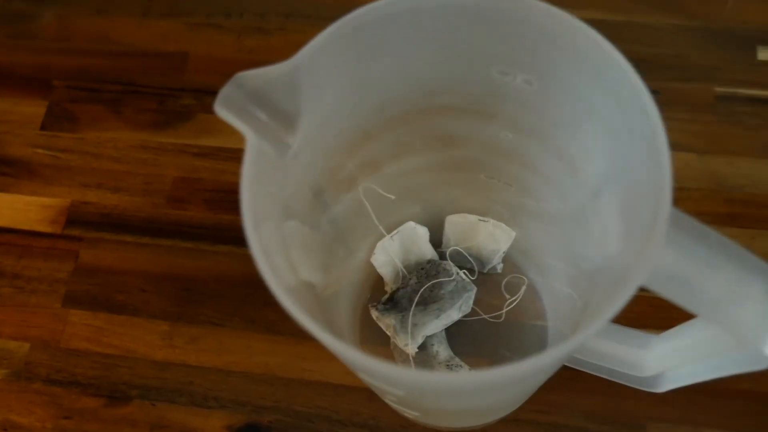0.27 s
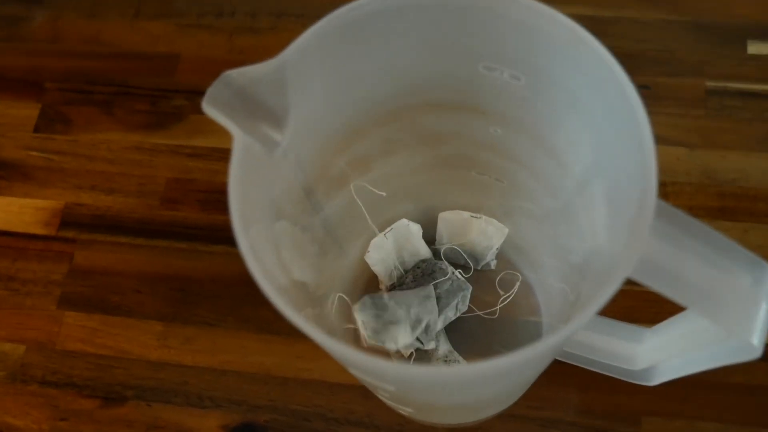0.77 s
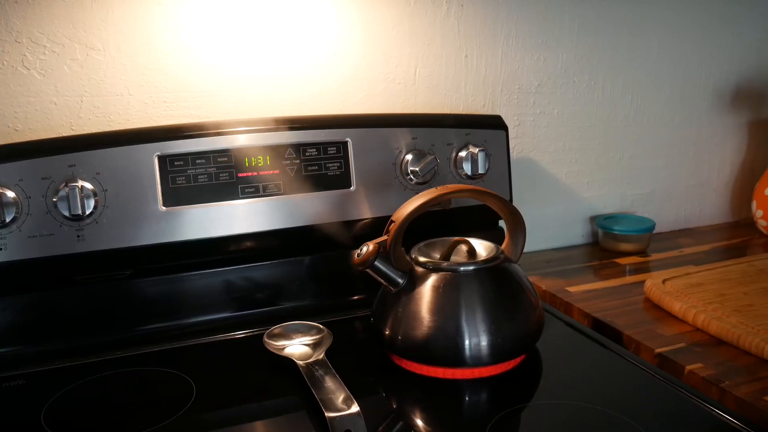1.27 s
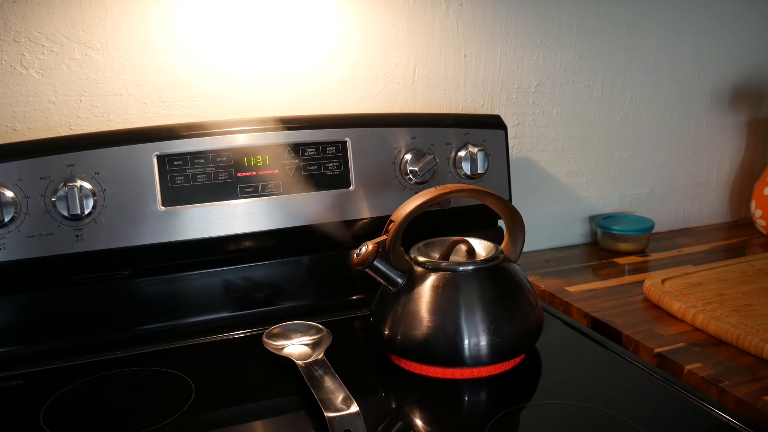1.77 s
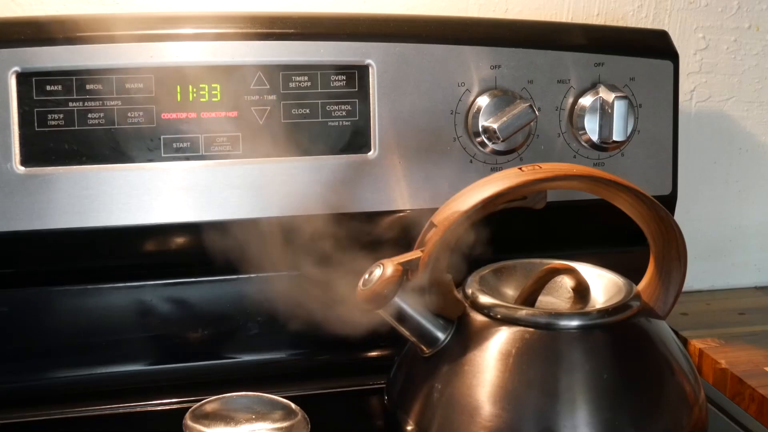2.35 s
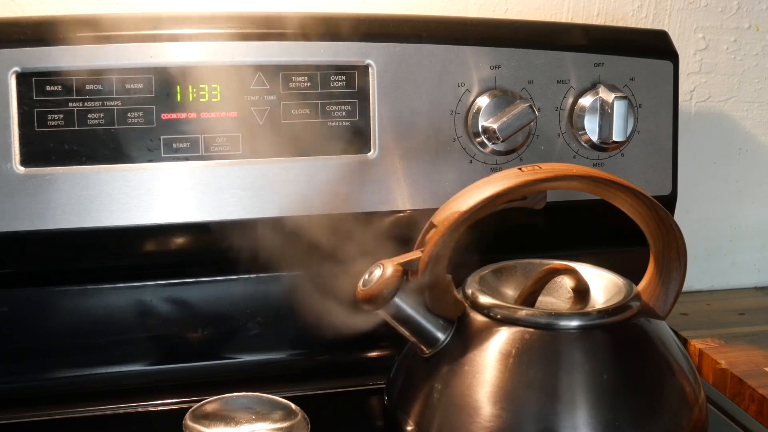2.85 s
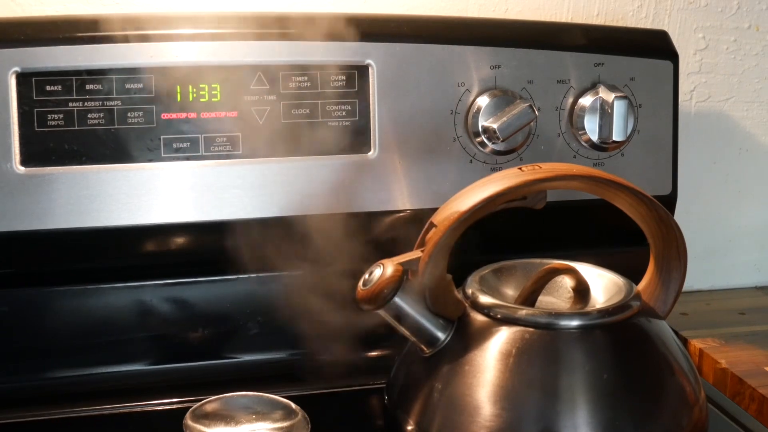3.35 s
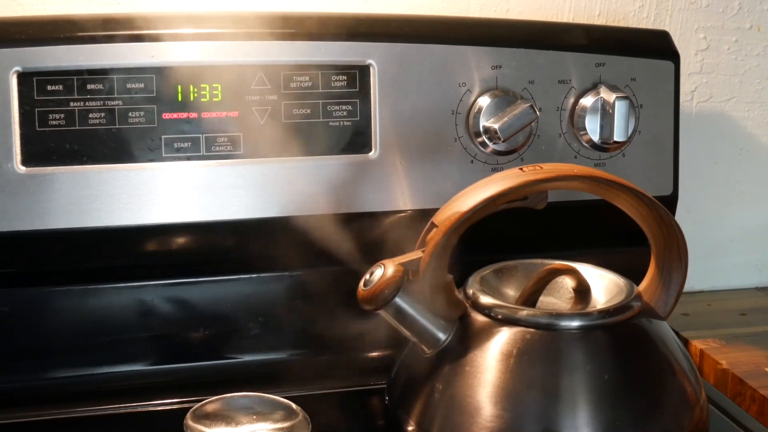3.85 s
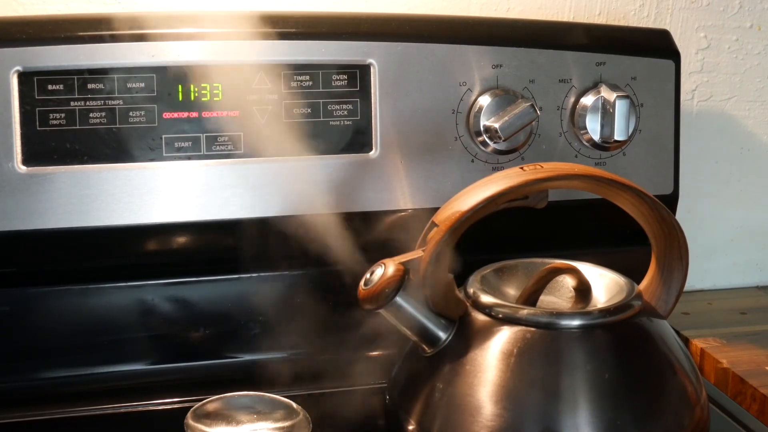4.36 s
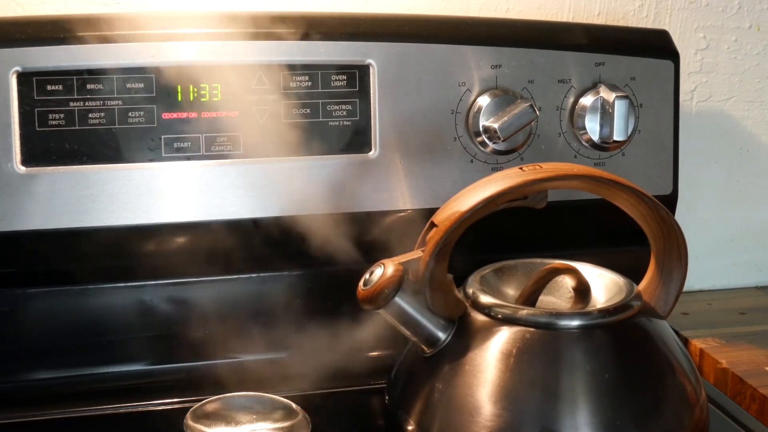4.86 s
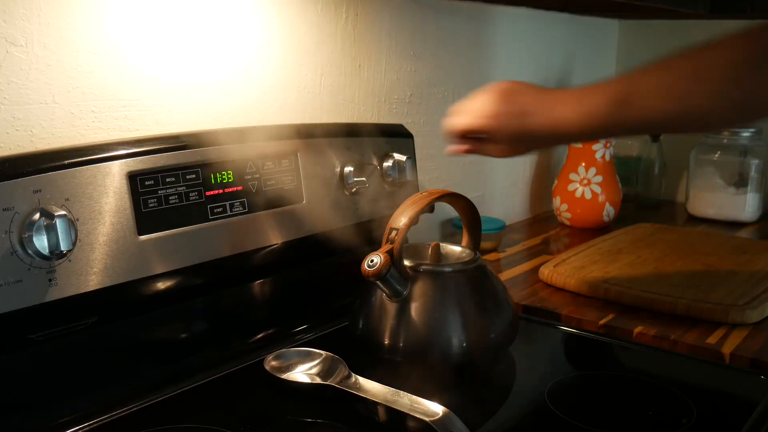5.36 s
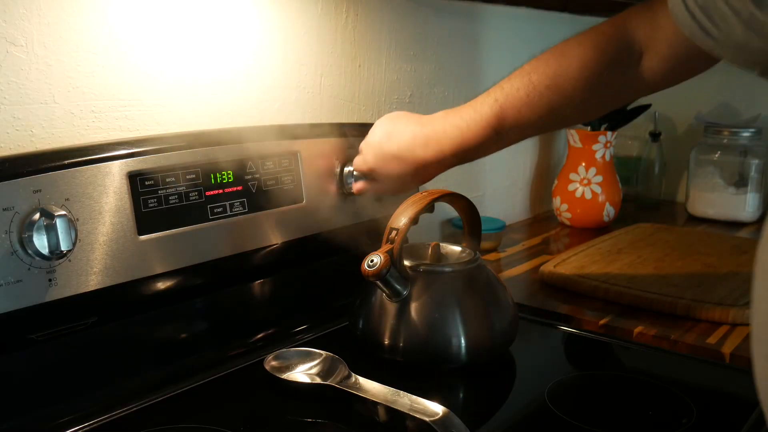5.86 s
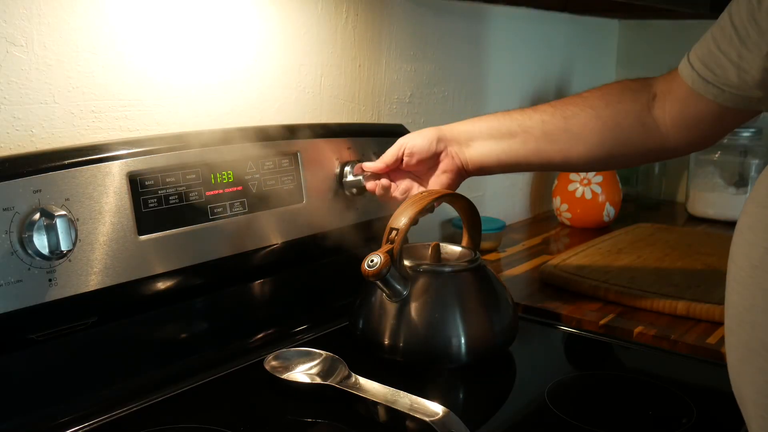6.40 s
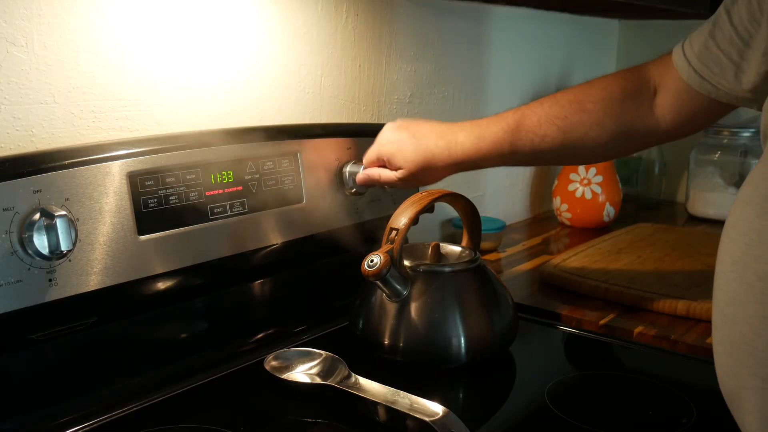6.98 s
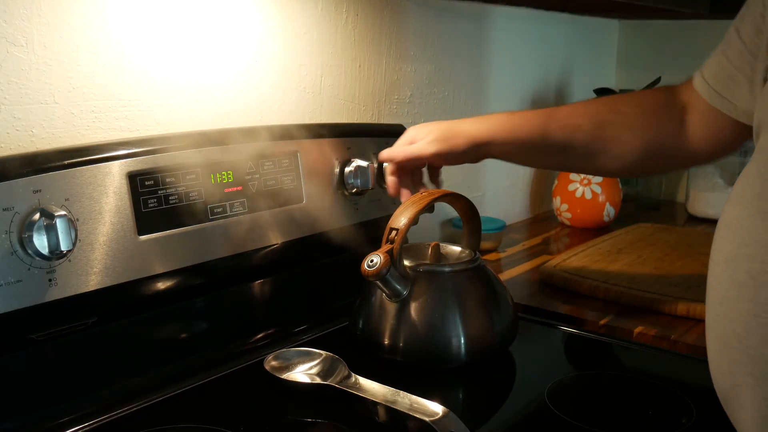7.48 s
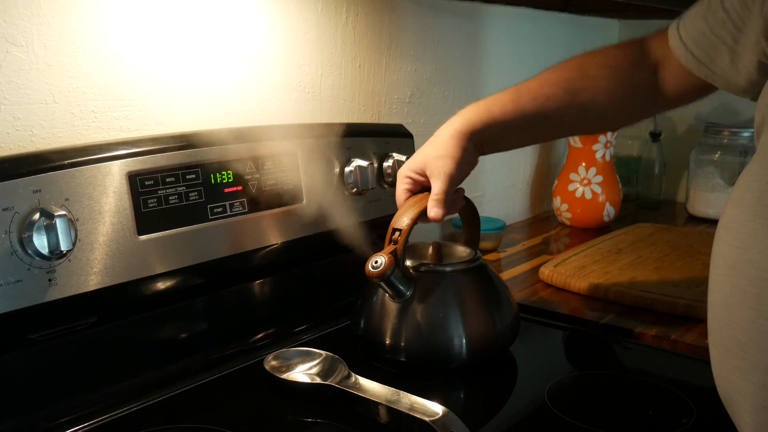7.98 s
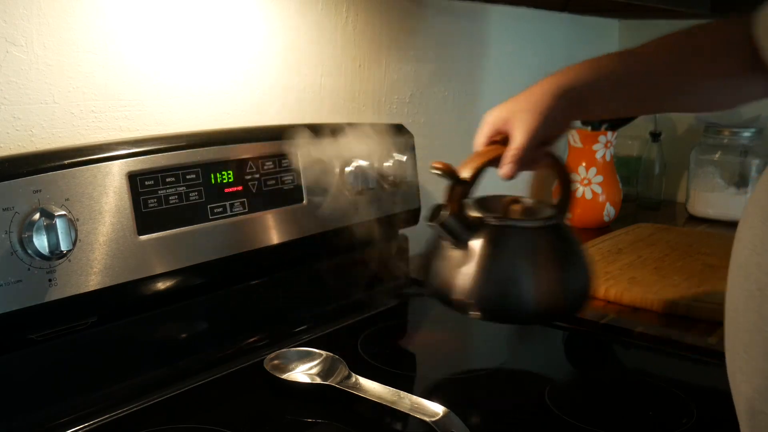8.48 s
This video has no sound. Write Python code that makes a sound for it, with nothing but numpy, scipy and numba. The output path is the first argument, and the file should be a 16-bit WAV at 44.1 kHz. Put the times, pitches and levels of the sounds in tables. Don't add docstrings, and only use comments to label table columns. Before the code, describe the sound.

Close stereo kitchen pickup with a faint fridge hum. Dull plastic taps come first, then a sudden strong high whistle with rough flutter. The close view brings a thinner two-toned whistle with steam hiss and brief lower chirps, later pulsing unevenly. Small knocks and a crisp knob click follow; the tone wobbles, sings high, collapses, and a metallic snap leaves quiet hum.

```python
import sys
import numpy as np
from scipy import signal
from scipy.fft import rfft, irfft
from scipy.io import wavfile
from scipy.ndimage import uniform_filter1d
from numba import njit

SR = 44100
rng = np.random.default_rng(int(sys.argv[2]) if len(sys.argv) > 2 else 0)


def volts(x):
    e = np.asarray(x, float) / 20
    return 10 ** e


def materialize(psi):
    bounded = np.clip(np.atleast_2d(psi).T, -1, 1)
    quanta = np.round(bounded * 32767).astype(np.int16)
    wavfile.write(sys.argv[1], SR, quanta)


N = 385434

FADE_S, SILENCE_S, WIDE_SHOT_S, CLOSE_SHOT_S = 0.8927, 0.908, 1.0255, 2.395
STOP_S = 8.035
CAP_HZ = 5845
SING_HZ = (4780, 5040)

# (start [Hz], rest [Hz], start level [dB], rest level [dB], time constant [s])
CLIMB = (4900, 5350, -27, -19, 0.38)
# (time [s], upper tone [Hz], level [dB], depth of pressure pulsing [0-1])
BOIL = [
    (2.4, 4470, -30.5, 0.05),
    (2.98, 4440, -34.5, .05),
    (4.3, 4440, -35, .2),
    (4.75, 4590, -33, .27),
    (4.85, 4770, -31, 1),
    (5.75, 4760, -32, 0.99),
    (6.44, 4740, -35.5, 0.99),
    (7.2, 4730, -33.5, 0.96),
    (7.67, 4780, -31, 0.99),
]
# (time [s], upper tone [Hz], level [dB])
TILT = [
    (7.695, 4850, -30),
    (7.71, 5170, -22.5),
    (7.795, 4800, -27),
    (7.832, 5120, -25),
    (7.858, 5320, -16),
    (7.92, 5530, -20.5),
    (7.97, 5520, -19),
    (8.012, 5420, -17.5),
    (8.04, 4850, -27),
]


def pressure(t):
    if t[-1] < CLOSE_SHOT_S:
        start_hz, rest_hz, start_db, rest_db, tau = CLIMB
        left = np.exp(-np.maximum(t - WIDE_SHOT_S, 0) / tau)
        up_hz = rest_hz + (start_hz - rest_hz) * left
        up_db = rest_db + (start_db - rest_db) * left
        return up_hz, up_db, 0.45 + 0 * t
    tilt = [row + (0.222,) for row in TILT]
    s, *columns = np.transpose(BOIL + tilt)
    return [np.interp(t, s, c) for c in columns]


# (time [s], peak level [dB], frequency [Hz])
LOCKS = [(2.488, -37, 3045), (2.558, -20.5, 2932), (2.7076, -29.5, 2780), (2.826, -23, 2914),
         (3.059, -39, 2760), (3.1356, -29.5, 2800), (3.205, -33, 2780), (3.2798, -34.5, 2790),
         (3.3466, -35, 2853), (3.657, -31.5, 2920), (3.8361, -46, 2861), (4.084, -32, 2780),
         (4.1409, -38, 2937), (4.3195, -33.5, 2787), (4.526, -25, 2920), (5.6753, -33.5, 2953),
         (5.7622, -28, 2946), (5.86, -27, 2920), (6.1389, -33, 3015), (6.3015, -35, 2930),
         (6.493, -36.5, 3009), (6.8063, -31, 2750), (7.1241, -36, 2971), (7.24, -30, 2920)]


def steam(t, hiss_db, low_rel_db):
    low_rest_hz, swell_s, cap_floor_db = 2552, 0.021, -54
    puff_s, puff_rise_s = 8.165, 0.017
    up_hz, up_db, depth = pressure(t)
    sing = np.interp(up_hz, SING_HZ, [0, 1])

    swell = np.zeros(len(t))
    for t0, db, _ in LOCKS:
        swell += min(volts(db + 25), 1) * np.exp(-((t - t0 - swell_s / 2) / swell_s) ** 2)
    up_db = up_db - 4 * swell
    low_hz = low_rest_hz + sing * (0.512 * up_hz - low_rest_hz) + 0.6 * swell * (CAP_HZ / 2 - low_rest_hz)

    cap_db = np.maximum(-42.5 + 1.5 * depth - 2.05 * (up_db + 33), cap_floor_db)
    cap_db = np.where(t > TILT[0][0], cap_floor_db, cap_db)
    hiss_db = hiss_db + 2.5 * np.maximum(depth, sing)
    low_db = hiss_db + low_rel_db - 4 * sing

    after = np.maximum(t - STOP_S, 0)
    fall_db = np.minimum(700 * after, 80)
    puff_db = -46.5 - np.where(t > puff_s, 150 * (t - puff_s), 20 * (puff_s - t) / puff_rise_s)
    hiss_db = np.maximum(hiss_db - 200 * after, puff_db)
    return up_hz, up_db - fall_db, low_hz, low_db - fall_db, cap_db - fall_db, hiss_db, np.clip(depth, 0, 1), sing


def boil_pulse(pulse_hz, n):
    phase_hz = pulse_hz * (1 + 0.16 * walk(14, n))
    pulse = glide(phase_hz) * 1.4 * volts(2.5 * walk(9, n) - 1)
    return np.clip(pulse, -1.6, 1.6)


def upper_tone(hz, width_hz):
    sustained = glide(hz + 0.45 * width_hz * walk(220, len(hz)))
    return 0.59 * ring(hz, width_hz) + 0.98 * sustained


def lower_tone(hz, width_hz, sway_hz, pulse, depth):
    n = len(hz)
    zigzag_hz = hz + sway_hz * (1.1 * np.maximum(pulse, -0.6) - 0.25) + 40 * walk(40, n)
    held = 0.8 * glide(zigzag_hz + 0.25 * width_hz * walk(200, n))
    lower = 0.87 * ring(zigzag_hz, width_hz) + held
    return lower * volts((3 - 6.5 * depth) * pulse + 2 * walk(40, n))


def lock_in(t):
    lock = np.zeros(len(t))
    for t0, db, _ in LOCKS:
        lock += volts(db) * np.exp(-((t - t0 - 0.009) / 0.0073) ** 2)
    times, lock_hz = np.transpose(LOCKS)[[0, 2]]
    return lock, lock * glide(np.interp(t, times, lock_hz))


# (lower width [Hz], pulsing rate [Hz], sum tone level [dB], hiss level [dB],
# lower tone over hiss [dB], rim mode [Hz])
WIDE_TONE = (292.5, 42.5, -23.5, -43, 17, 4674)
CLOSE_TONE = (239, 26, -29, -43, 7.5, 4593.5)
# (frequency [Hz], density [dB per Hz])
JET = [(150, -30), (500, -6), (1000, -14.5), (1700, -11), (2300, 3), (3300, -8), (4100, -14), (4500, -7.5),
       (5500, 4), (6800, -0.5), (8000, -8), (10000, -8), (12500, -17), (15500, -36)]
# (frequency [Hz], density [dB per Hz])
JET_WIDE = [(150, -42), (500, -14), (1000, -12.5), (1700, -14), (2200, -5.5), (3200, 0.5), (4000, -25),
            (4600, -10.5), (5500, 4), (6800, -1), (8000, -6), (10000, -9), (12500, -16), (15500, -44)]


def whistle(tone, max_sway_hz, jet, t):
    low_width, pulse_hz, sum_db, hiss_rest_db, low_rel_db, rim_hz = tone
    up_hz, up_db, low_hz, low_db, cap_db, hiss_db, depth, sing = steam(t, hiss_rest_db, low_rel_db)
    n = len(t)

    octave_db = np.interp(sing, [0, 1], (-17, -24.5))
    up_width = np.interp(sing, [0, 1], (140, 270)) + 120 * depth * (1 - sing)
    sway_hz = max_sway_hz * np.interp(sing, [0, 1], (0.97, 0.493)) * (1 - 0.3 * depth)

    pulse = boil_pulse(pulse_hz, n)
    rest_hz = up_hz - 90 * depth
    upper = upper_tone(rest_hz + 260 * depth * np.maximum(pulse, 0), up_width)
    lower = lower_tone(low_hz, low_width, sway_hz, pulse, depth)
    lock, locked = lock_in(t)

    beads_db = (2.5 + 4 * depth) * pulse
    cap_gain = volts(cap_db - 4.5 + 2 * walk(18, n) + beads_db) + 0.17 * lock
    cap = ring(CAP_HZ + 45 * walk(30, n), 170) * cap_gain

    rim = ring(np.minimum(up_hz, rim_hz), 90) * np.maximum(depth, sing) * (t < STOP_S) * volts(hiss_db + 4)
    rim = rim * volts(-7 * np.interp(up_hz, [SING_HZ[0], 5350], [0, 1]))

    squared = (upper * volts(up_db) + 2 * rim) ** 2
    squared = squared / (volts(2 * up_db) + 4 * uniform_filter1d(rim ** 2, size=4096))
    octave_hz = 2 * (rest_hz - 120 * depth * (1 - sing))
    octave_width = np.interp(sing, [0, 1], (2.5, 5)) * up_width
    octave = unit(svf(squared, octave_hz, octave_width)) * volts(up_db + octave_db)
    sum_tone = unit(svf(upper * lower, up_hz + low_hz, np.full(n, 700.))) * volts(up_db + sum_db)

    hiss = coloured(jet, n, 4.4) * volts(hiss_db + 3.5 + 0.72 * walk(12, n) + 0.94 * depth * pulse)
    shoulder = ring(np.full(n, 3190.), 460) * sing * volts(up_db - 25.5)
    tones = rim + shoulder + upper * volts(up_db - 1.5) + lower * volts(low_db - 4)
    tones = tones + locked + 1.16 * cap + octave + sum_tone
    return room(tones + 1.005 * hiss.mean(axis=0), -2.45, 0.3) + 0.68 * hiss[::-1] + 0.497 * cap


# (time [s], level [dB], push time [s])
SWITCH = [
    (7.1205, -40, 0.00086),
    (7.1226, -5.5, 0.00048),
    (7.1265, -18, 0.00024),
    (7.132, -12, 0.00122),
    (7.14, -18, 0.0012),
]
# (frequency [Hz], level [dB], T60 [s])
SWITCH_MODES = [(299, -16.5, 0.057), (486, -7.5, 0.024), (850, -7.5, 0.03), (1167, -10.5, 0.058),
                (1390, -5.5, 0.0335), (1900, 5.5, 0.014), (2150, 3.5, 0.02), (3340, 0, 0.008),
                (10500, -11, 0.019)]
# (time [s], level [dB], push time [s])
SNAP = [
    (8.199, -21.5, 0.00089),
    (8.2022, -11, 0.0013),
    (8.204, 1.5, 0.00088),
    (8.2095, -14, 0.00059),
    (8.214, -33, 0.002),
    (8.219, -19.5, .001),
]
# (frequency [Hz], level [dB], T60 [s])
SNAP_MODES = [(201.5, -29, .1), (463, -11.5, 0.022), (1500, -11, 0.009), (1968, -1, 0.013),
              (2440, -0.5, 0.02), (2920, 1, 0.012), (3320, 7.5, 0.0087), (3740, -3, 0.0089),
              (5440, -3, 0.0076)]
# (time [s], level [dB], T60 below 6 kHz [s], T60 above 6 kHz [s])
SWITCH_TAIL = (7.1261, -23.5, 0.3741, 0.04)
SNAP_TAIL = (8.208, -21.5, .48, .33)
# (frequency [Hz], density [dB per Hz])
SWITCH_COLOUR = [(100, -12), (300, -10), (900, -1.5), (2000, -4), (3500, -12), (8000, -29), (15000, -22)]
SNAP_COLOUR = [(150, -26), (500, -12), (1000, -13), (1800, -10), (2400, -4), (3270, 1), (4050, -8.5),
               (6430, -5), (10000, -8.5), (15000, -28)]


def snaps():
    out, t = np.zeros(N + SR), impact_time()
    for blows, modes, grit_db in ((SWITCH, SWITCH_MODES, -6), (SNAP, SNAP_MODES, -1.5)):
        for t0, db, push in blows:
            luck = rng.standard_normal((len(modes), 2))
            shifted = [(hz * (1 + 0.03 * a), level + 1.5 * b, t60)
                       for (hz, level, t60), (a, b) in zip(modes, luck)]
            grit = volts(grit_db) * ring(np.full(len(t), 7000.), 13300.) * np.exp(-t / 0.0022)
            i = int(t0 * SR)
            out[i:i + len(t)] += volts(db - 2.5) * (struck(shifted) + grit) * (1 - np.exp(-t / push))
    return out[:N] + echo(SWITCH_TAIL, SWITCH_COLOUR) + echo(SNAP_TAIL, SNAP_COLOUR)


def echo(tail, colour):
    t0, db, low_t60, high_t60 = tail
    t = np.arange(SR // 2) / SR
    x = coloured(colour, len(t), 0.48)
    low = signal.sosfiltfilt(signal.butter(2, 6000, fs=SR, output="sos"), x)
    x = low * volts(-60 * t / low_t60) + (x - low) * volts(-60 * t / high_t60)
    out, i = np.zeros((2, N)), int(t0 * SR)
    out[:, i:i + len(t)] = volts(db) * x * (1 - np.exp(-t / 0.00069))
    return out


# (time [s], peak level [dB], body [Hz], crack level [dB], crack [Hz])
KNOCKS = [(.666, -35, 320, -43, 2200), (0.696, -54, 331, -33, 2200), (.704, -27.5, 334, -33, 1800),
          (0.874, -33.5, 334, -54, 2000), (4.553, -29.5, 147, -62, 1026), (4.578, -32, 211.2, -60, 1003),
          (4.603, -31.5, 135.2, -60, 994.8), (5.497, -31, 850, -42, 1200), (5.525, -44.5, 850, -35, 1190),
          (5.741, -34, 824, -48, 1500), (5.769, -25.5, 810, -30, 1500), (6.541, -19.5, 646, -25, 1500),
          (6.544, -18.5, 850, -23, 6000), (7.365, -31, 800, -37.5, 600), (7.992, -34, 463.6, -53, 1200),
          (8.515, -57, 800, -43.5, 9000)]


def knocks():
    out, t = np.zeros(N + SR), impact_time()
    for t0, db, hz, crack_db, crack_hz in KNOCKS:
        t60 = 0.084 * (hz / 300) ** -0.76
        body = struck([(hz, db, t60), (1.17 * hz, db - 14, 0.64 * t60)])
        crack = ring(np.full(len(t), 1. * crack_hz), 1.7 * crack_hz) * np.exp(-t / 0.006)
        i = int(t0 * SR)
        out[i:i + len(t)] += body * (1 - np.exp(-t / 0.00058)) + volts(crack_db) * crack
    return room(out[:N], -4.5, 0.68)


# (frequency [Hz], density [dB per Hz])
COUNTER = [(15, -64.5), (25, -39.5), (75, -12), (148, -22.5), (209, -8.5), (253, -18), (359, -10.5),
           (469, -21), (871, -23), (1750, -28), (1900, -27.5), (4150, -21.5), (5140, -22), (9810, -17),
           (15500, -29)]
STOVE = [(15, -72), (25, -44), (38, -18.5), (112, -7), (244, -8), (311, -6), (356, -12), (478, -10.5),
         (532, -13.5), (677, -16), (934, -19.5), (1010, -18), (1640, -24.5), (3770, -24), (7000, -22.5),
         (15200, -32)]
# (frequency [Hz], width [Hz], level by the jug [dB], level by the stove [dB])
HUM = [(113.9, 12, -57.5, -51.5), (216.8, 9.37, -45.5, -51.5), (355.8, 21.27, -53, -55)]


def kitchen(t):
    jug = t < 1
    counter, stove = coloured(COUNTER, N, -0.1) * volts(-37), coloured(STOVE, N, 0.081) * volts(-43)
    out = np.where(jug, counter, stove)
    for hz, width, jug_db, stove_db in HUM:
        ears = np.array([[0.4], [-0.4]])
        motor = 0.81 * glide(hz + 0.199 * width * walk(12, N), ears)
        out = out + (0.75 * ring(np.full(N, 1. * hz), width) + motor) * volts(np.where(jug, jug_db, stove_db))
    return out


def room(x, wet_db, wide):
    t, t60 = np.arange(SR // 2) / SR, 0.24
    mid, side = rng.standard_normal((2, len(t))) * np.exp(-np.log(1000) * t / t60) * (t > 0.003)
    tail = np.array([mid + wide * side, mid - wide * side]) / np.sqrt(np.sum(mid ** 2))
    return x + volts(wet_db) * signal.fftconvolve(x[None], tail, axes=1)[:, :len(x)]


# (frequency [Hz], level [dB])
SPREAD = [(25, -1), (70, -6.5), (500, -8), (2000, -2), (4500, -19), (8000, -10), (12000, -2)]


def coloured(shape, size, wide_db):
    f = np.log(np.maximum(np.fft.rfftfreq(size, 1 / SR), 1))
    hz, level = np.transpose(shape)
    spread_hz, spread_db = np.transpose(SPREAD)
    db = np.interp(f, np.log(hz), level)
    side_db = db + np.interp(f, np.log(spread_hz), spread_db) + wide_db
    mid, side = irfft(rfft(rng.standard_normal((2, size))) * volts(np.array([db, side_db])), size)
    return np.array([mid + side, mid - side]) / np.sqrt(np.mean(mid ** 2))


def impact_time():
    return np.arange(int(0.15 * SR)) / SR


def struck(modes):
    t, body = impact_time(), 0
    for hz, db, t60 in modes:
        body = body + volts(db) * np.sin(2 * np.pi * hz * t) * np.exp(-np.log(1000) * t / t60)
    return body


def ring(hz, width_hz):
    width = width_hz + 0 * hz
    return unit(svf(svf(rng.standard_normal(len(hz)), hz, width), hz, width))


@njit
def svf(x, hz, width):
    y, band, low = np.empty(len(x)), 0., 0.
    for i in range(len(x)):
        g, k = np.tan(np.pi * hz[i] / SR), width[i] / hz[i]
        v = (band + g * (x[i] - low)) / (1 + g * (g + k))
        band, low, y[i] = 2 * v - band, low + 2 * g * v, k * v
    return y


def glide(hz, phase=0):
    return np.sin(2 * np.pi * np.cumsum(hz) / SR + phase)


def walk(rate, size):
    k = int(SR / rate)
    held = np.repeat(rng.standard_normal(size // 50), k)[:size]
    return unit(uniform_filter1d(uniform_filter1d(held, k), k))


def unit(x):
    return x / np.sqrt(np.mean(x ** 2))


def scene():
    t, lead = np.arange(N) / SR, SR // 2
    a, b = int(WIDE_SHOT_S * SR), int(CLOSE_SHOT_S * SR)
    out = kitchen(t) + knocks() + snaps()
    out[:, a:b] += whistle(WIDE_TONE, 100, JET_WIDE, np.arange(a - lead, b) / SR)[:, lead:]
    out[:, b:] += whistle(CLOSE_TONE, 240, JET, np.arange(b - lead, N) / SR)[:, lead:]
    fade = np.where(t < WIDE_SHOT_S, np.interp(t, [FADE_S, SILENCE_S], [1, 0]), 1)
    return out * fade * volts(np.array([[0.2], [-0.2]]))


def band_limit(x):
    return signal.sosfilt(signal.butter(12, 15200, fs=SR, output="sos"), x)


def record(dry):
    x = signal.sosfilt(signal.butter(2, 55, "high", fs=SR, output="sos"), dry)
    x = signal.lfilter(*signal.iirnotch(7850, 45, SR), x)
    mix = 1.1 * np.tanh(x / 1.1)
    return band_limit(mix)


dry = scene()
out = record(dry)
materialize(out)
```